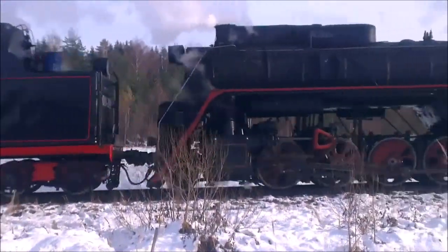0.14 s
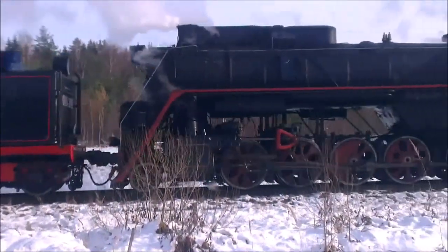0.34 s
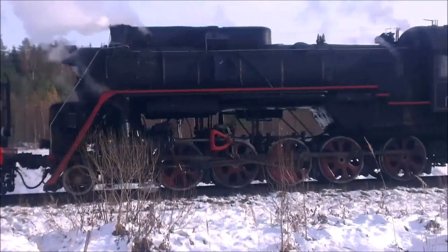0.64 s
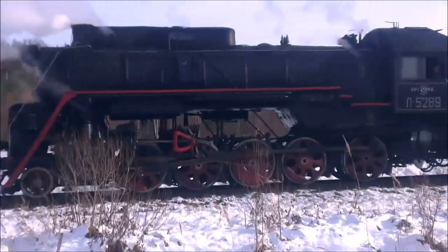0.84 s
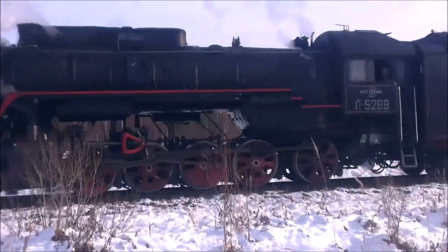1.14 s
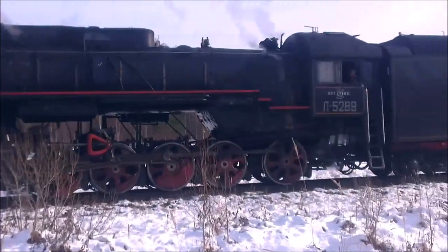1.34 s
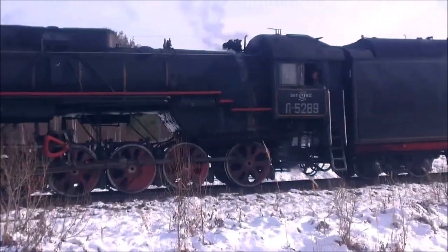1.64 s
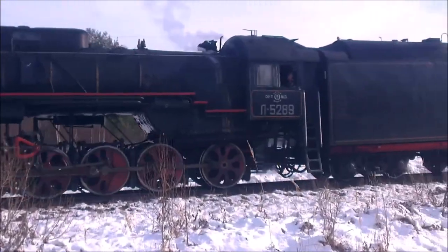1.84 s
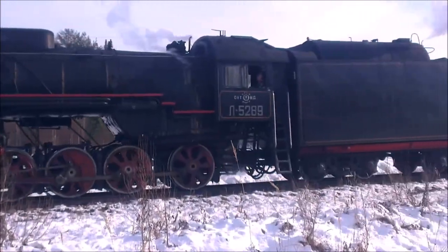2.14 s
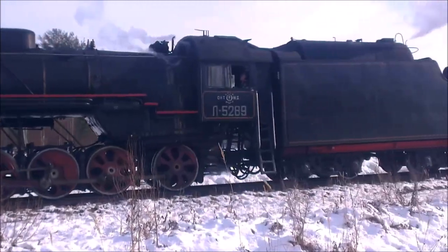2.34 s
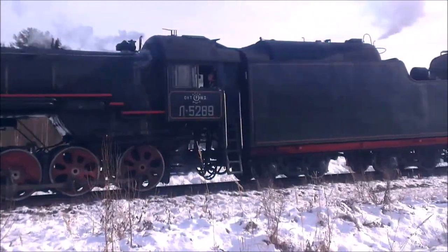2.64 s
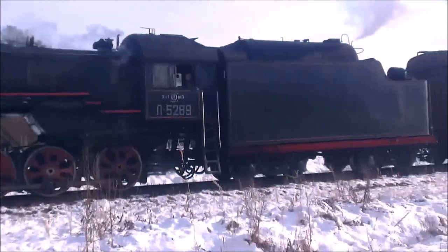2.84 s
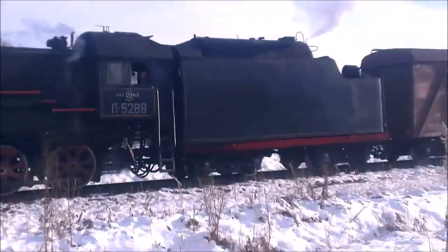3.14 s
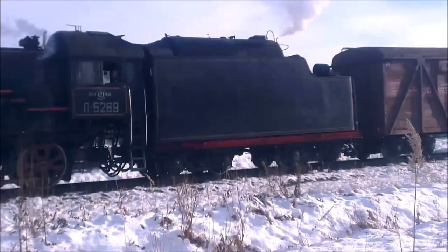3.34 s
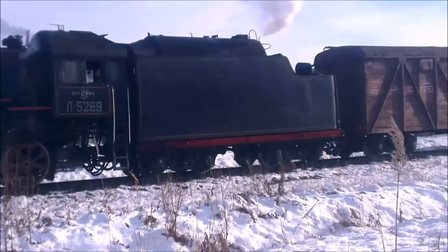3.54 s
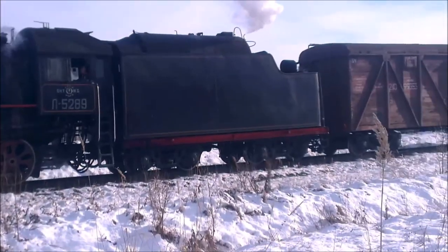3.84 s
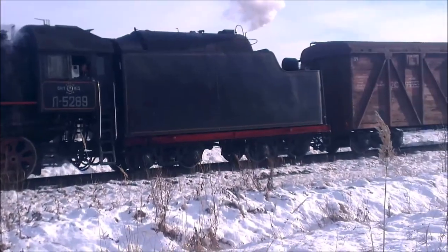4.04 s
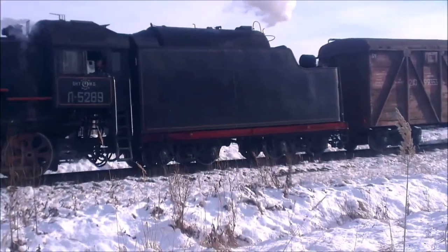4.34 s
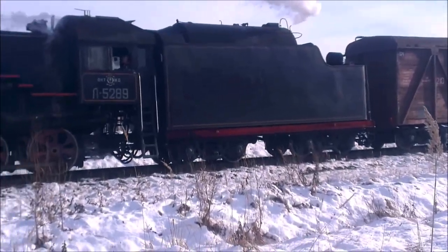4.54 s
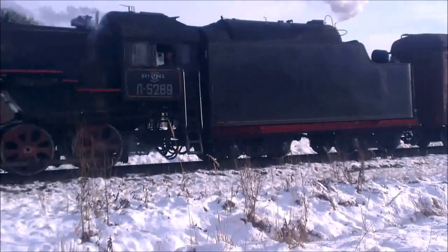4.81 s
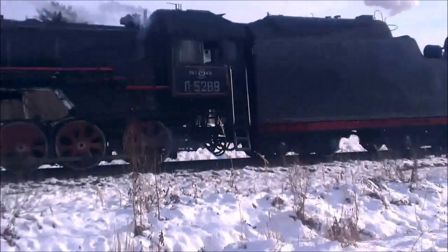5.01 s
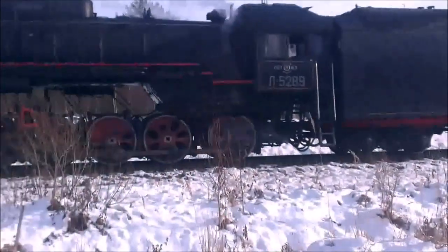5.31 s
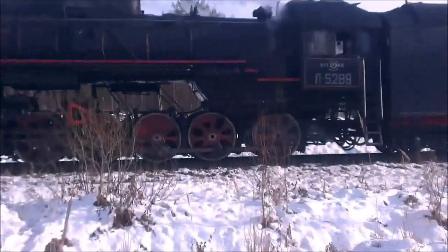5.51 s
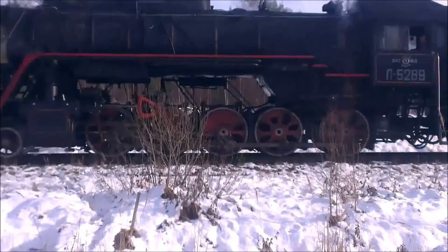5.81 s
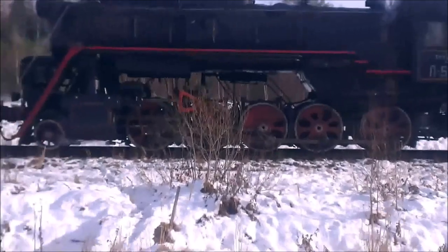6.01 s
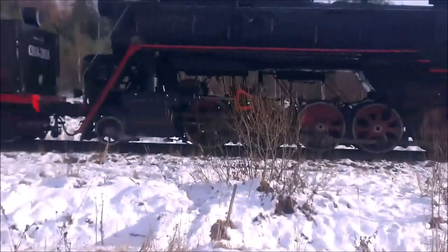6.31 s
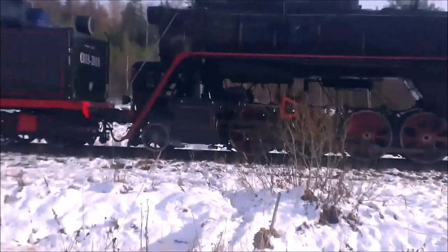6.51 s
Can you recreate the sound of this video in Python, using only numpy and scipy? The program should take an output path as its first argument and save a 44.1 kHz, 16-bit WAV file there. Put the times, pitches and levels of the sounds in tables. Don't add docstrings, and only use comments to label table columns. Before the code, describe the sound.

Outdoors beside a snowy railway, two steam locomotives pass close by. Dense, bright steam hiss runs throughout, over a thin roar of draught and wheels and a steady high turbine buzz. Quick valve puffs cluster at the start, then hollow chimney chuffs come about once a second. Dry squeaks chirp near the middle. The hiss recedes, then swells again toward the end. Handheld stereo microphone, little bass.

```python
import sys
import numpy as np
from scipy import signal
from scipy.fft import rfft, irfft, next_fast_len
from scipy.io import wavfile
from scipy.ndimage import uniform_filter1d, map_coordinates

SR = 44100
rng = np.random.default_rng(int(sys.argv[2]) if len(sys.argv) > 2 else 0)


def level_to_linear(level):
    exponent = np.asarray(level, float) / 20
    return 10 ** exponent


def to_wav(s):
    ch = np.atleast_2d(s).T
    pcm = np.round(np.clip(ch, -1, 1) * 32767)
    wavfile.write(sys.argv[1], SR, pcm.astype(np.int16))


N = 293706
PAD = next_fast_len(N + 4096)
HZ = np.maximum(np.arange(PAD // 2 + 1) * SR / PAD, 1)
T = np.arange(N) / SR

# (time [s], flow [dB], brightness [dB], left-right bearing [dB])
LEAKS = [(0, -25, -1.5, -4.5), (.65, -21.5, 2, -3), (1.45, -21, -1.5, -4), (2.05, -25, 2, -2),
         (2.34, -26, 2, -2), (2.69, -23, 0.5, -2), (3.2, -29, -0.5, -1), (3.54, -32, 3.5, -6),
         (3.74, -26, 9, 3.5), (3.91, -24.5, -3, -6), (4.15, -27, -8.5, -2.5), (4.5, -28, 0.1, -5),
         (4.73, -24, -1.5, -4.5), (5.03, -27.5, -2.5, -3.5), (5.2, -20.5, 3.5, -7.5), (5.55, -21, 2, -6),
         (6.3, -20, -0.5, -7), (6.66, -21, 0.5, -5)]
# (frequency [Hz], density [dB per Hz])
JET_SPECTRUM = [(700, -9), (1200, 3.5), (2000, -4), (2500, -2), (2900, -3.5), (3600, -2.5), (4400, -6),
                (5600, -12.5), (6750, -5.5), (7900, -10), (9500, -8), (11300, -17.5), (13000, -21.5),
                (15200, -25.5)]
# (time [s], level [dB], exposure [dB])
DRAUGHT = [(0, -30, 1), (.35, -32, 0.5), (.83, -33, -1.8), (1.2, -34, -4.5), (1.6, -36.5, 0.5),
           (2.1, -37.5, 3), (2.4, -39, 0), (2.8, -40.5, 1), (3.5, -44.5, -1.5), (4.1, -40, 0.5),
           (4.45, -41, -1.5), (4.7, -38.5, 1), (5.3, -37.5, 0), (5.64, -42.5, 1.5), (6.2, -37.5, -7),
           (6.66, -41.5, -2.5)]


def rms_one(x):
    return x / np.sqrt(np.mean(x ** 2) + 1e-20)


def in_time(rows):
    s, *columns = np.transpose(rows)
    return [np.interp(T, s, column) for column in columns]


def at_hz(points):
    hz, value = np.transpose(points)
    return np.interp(np.log(HZ), np.log(np.maximum(hz, 1)), value)


def around(s, reach_s):
    return slice(max(int((s - reach_s) * SR), 0), int((s + reach_s) * SR))


def follow(curve_db, offset_db, share):
    mean_db = curve_db.mean()
    return mean_db + offset_db + share * (curve_db - mean_db)


def near_to_far(near, far):
    # (time [s], 0 near - 1 far)
    away = [(0, -.2), (.6, 0.21), (1.2, 0.6), (2.2, 0.91), (4.2, 0.96), (5, 0.79), (5.3, 0.53), (5.9, .2),
            (6.3, 0.46), (6.66, 0.23)]
    return near + (far - near) * in_time(away)[0]


def drift(rate_hz):
    pole = np.exp(-2 * np.pi * rate_hz * 40 / SR)
    draws = rng.standard_normal(N // 40 + 2002)
    slow = signal.lfilter([1], [1, -2 * pole, pole ** 2], draws)[2000:]
    return np.interp(np.arange(N) / 40, np.arange(len(slow)), rms_one(slow))


def at_ports(spectrum, diffuse=1.0):
    # (frequency [Hz], likeness [0-1])
    likeness = [(100, 0.7), (300, 0.72), (700, 0.37), (1300, 0.67), (1700, 0.22), (1900, 0.78), (2400, 0.3),
                (2800, 0), (4200, 0.31), (5500, 0), (15000, 0.1)]
    # (frequency [Hz], phase [rad])
    port_lag = [(300, 0), (600, -.9), (1000, -1.9), (1350, -3.1), (1700, -3.6), (2300, -6.3), (3000, -9.4),
                (3450, -12.5), (4100, -15.7), (5000, -18.8), (6000, -22), (8000, -30), (11000, -41),
                (16000, -60)]
    alike = 1 - diffuse * (1 - np.clip(at_hz(likeness), 0, 1))
    scattered = np.abs(spectrum) * rfft(rng.standard_normal(PAD)) / np.sqrt(PAD)
    delayed = spectrum * np.exp(1j * at_hz(port_lag))
    return np.array([spectrum, alike * delayed + np.sqrt(1 - alike ** 2) * scattered])


def noise(gain):
    return gain * at_ports(rfft(rng.standard_normal(PAD)))


def band(spectra, low_hz, high_hz):
    edges = 1 / np.sqrt((1 + (low_hz / HZ) ** 16) * (1 + (HZ / high_hz) ** 16))
    return rms_one(irfft(spectra * edges, PAD)[:, :N])


def hiss(gust_db, flutter_db, patchy_db):
    # (low edge [Hz], high edge [Hz])
    leak_bands = [(2800, 5500), (1300, 2800), (8000, 19000)]
    # (offset [dB], share of flow, share of brightness, share of exposure)
    follows = [
        (2.5, 0.9, 0.0, 0.59),
        (-7, 0.37, -0.3, 1.0),
        (-5.5, 1.04, 1.0, 0.52),
    ]
    # (time [s], level [dB])
    fine_leak = [(0.0, -25.5), (1.67, -27.5), (2.32, -36.5), (2.82, -29.5), (3.32, -31.5), (3.91, -26),
                 (4.36, -30.5), (4.64, -26.5), (4.88, -41), (5.06, -33), (5.42, -24), (6.05, -19.5),
                 (6.29, -27), (6.66, -23)]
    # (low edge [Hz], high edge [Hz])
    fine_band = (5500, 8000)
    flow_db, bright_db, pan_db = in_time(LEAKS)
    exposure_db = in_time(DRAUGHT)[1]
    levels_db = [follow(flow_db, offset_db, flow) + bright * bright_db + facing * exposure_db
                 for offset_db, flow, bright, facing in follows]
    levels_db += in_time(fine_leak)
    jets = noise(level_to_linear(at_hz(JET_SPECTRUM)))
    shared_db = gust_db * drift(6.3) + flutter_db * drift(53.0)
    out = np.zeros((2, N))
    for level_db, edges in zip(levels_db, leak_bands + [fine_band]):
        out += level_to_linear(level_db + shared_db + patchy_db * drift(14.0)) * band(jets, *edges)
    return out * level_to_linear(np.outer([.5, -.5], pan_db - pan_db.mean()))


def nozzle(law, width_hz, flicker_db):
    near_hz, far_hz, offset_db, share = law
    level_db = follow(in_time(LEAKS)[0], offset_db, share)
    low_pass = 1 + (2 * HZ / width_hz) ** 4
    in_phase, quadrature = irfft(np.array([noise(0.91), noise(0.91)]) / low_pass, PAD)[..., :N]
    turn = 2 * np.pi * np.cumsum(near_to_far(near_hz, far_hz)) / SR
    carried = rms_one(in_phase * np.cos(turn) + quadrature * np.sin(turn))
    return level_to_linear(level_db + flicker_db * drift(11.3)) * carried


def over_snow(x, low_hz, high_hz):
    snow_lag_ms = (0.743, 0.915)
    snow_strength = (0.21, 0.049)
    edges = 1 / np.sqrt((1 + (low_hz / HZ) ** 6) * (1 + (HZ / high_hz) ** 6))
    middle = irfft(rfft(x, PAD) * edges, PAD)[:, :N]
    arrival = np.arange(N) - near_to_far(*snow_lag_ms) * SR / 1000
    late = np.array([map_coordinates(m, [arrival], order=1) for m in middle])
    return x + np.clip(near_to_far(*snow_strength), 0, 1) * late


def roar(lumpy_db):
    # (frequency [Hz], density [dB per Hz])
    colour = [(65, -91), (110, -48.5), (338, -24), (472, -26.5), (661, -14.5), (924, -15), (1360, -14),
              (1980, -9), (2400, -7), (3120, -21), (5280, -120)]
    # (offset [dB], share of the swing, share of exposure)
    follows = [
        (0.5, 1.0, 0.0),
        (6, 0.17, 0.7),
        (-20.0, 0.66, 0.0),
    ]
    bands_hz = [(450, 1200), (1200, 2000), (40, 450)]
    rumble = noise(level_to_linear(at_hz(colour)))
    draught_db, exposure_db = in_time(DRAUGHT)
    out = np.zeros((2, N))
    for (offset_db, share, facing), edges in zip(follows, bands_hz):
        level_db = follow(draught_db, offset_db, share) + facing * exposure_db
        out += level_to_linear(level_db + lumpy_db * drift(16.0)) * band(rumble, *edges)
    return out


def shimmer(x, depth_db):
    frames = signal.stft(x, nperseg=512)[2]
    field = rng.standard_normal(frames.shape[1:])
    field = uniform_filter1d(field, size=2, axis=0)
    field = uniform_filter1d(field, size=24, axis=1)
    return signal.istft(frames * level_to_linear(depth_db * rms_one(field)), nperseg=512)[1][:, :N]


def turbine(uneven_db):
    # (time [s], level [dB])
    loudness = [(0, -27.5), (1.35, -23.5), (1.85, -24.5), (2.35, -27), (2.8, -26), (3.35, -28.5),
                (4.85, -25), (5.2, -30), (5.5, -18.5), (5.85, -25), (6.66, -23.5)]
    # (time [s], speed [turns per s])
    shaft_speed = [(0, 57.93), (1.35, 58.01), (2.85, 58.09), (3.35, 58.13), (4.35, 58.22), (5.85, 58.21),
                   (6.66, 58.16)]
    orders = [15, 17, 19, 23, 26, 28, 30, 31, 33, 37, 39, 40, 41, 42, 43, 45, 49, 53, 55, 57]
    orders_db = [-17.5, -16, -12, -1.5, -2.5, -17, -11, -6.5, -5, -3, -5.5, -1, 3, -1.5, -0.5, -27, -41,
                 2.5, 3.5, -19]
    turn = 2 * np.pi * np.cumsum(in_time(shaft_speed)[0]) / SR
    whine = np.zeros(N)
    for order, level_db in zip(orders, orders_db):
        whine += level_to_linear(level_db + uneven_db * drift(1.13)) * np.sin(order * turn)
    heard = irfft(at_ports(rfft(whine, PAD), diffuse=0), PAD)[:, :N]
    return level_to_linear(in_time(loudness)[0]) * rms_one(heard)


def recorder_noise(hiss_db, breeze_db):
    white = noise(1)
    breeze = level_to_linear(breeze_db + 7.0 * drift(9.0)) * band(white, 20, 110)[0]
    return level_to_linear(hiss_db) * band(white, 11500, 15000) + breeze


def swells(rows):
    power = np.zeros(N)
    for s, width_ms, level_db in rows:
        near = around(s, .2)
        widths = (T[near] - s) * 1000 / max(width_ms, 8)
        power[near] += level_to_linear(level_db) ** 2 * np.exp(-4 * np.log(2) * widths ** 2)
    return power


def puffs(ragged_db):
    # (time of peak [s], width [ms], level [dB], treble over middle [dB])
    valve_puffs = [(.036, 17, -18.5, -1), (.088, 26, -17.5, 20), (0.15, 16, -13.5, -4),
                   (0.226, 26, -14, -7.5), (.326, 50, -22.5, -14), (.403, 17, -13, -4), (.75, 33, -20, 5),
                   (.864, 82, -18, -6), (1.164, 15, -25, -2), (1.599, 39, -17.5, 11),
                   (1.739, 21, -18.5, 13), (1.787, 23, -22, -20), (1.9, 13, -20, -5), (2.0, 35, -19.5, 14),
                   (2.436, 41, -15, -2), (2.722, 16, -16.5, -7), (2.82, 40, -17.5, -13),
                   (3.265, 33, -20.5, -5), (3.41, 133, -23, -19), (3.739, 29, -11.5, 1.5),
                   (3.891, 29, -22, -4), (4.169, 54, -20.5, -13), (4.546, 40, -20, -12),
                   (5.063, 18.4, -26, -23), (5.187, 24, -26, 20), (5.538, 68, -15.5, -3),
                   (5.873, 24.7, -17, 0), (6.159, 76, -15, 3.5), (6.264, 47, -15, -6.5),
                   (6.589, 34, -22, -1)]
    # (time of peak [s], width [ms], level [dB])
    gasps = [(.036, 20, -26), (.149, 31, -22), (.224, 39, -28), (1.336, 75, -41), (1.787, 20, -24),
             (1.9, 11, -29), (2.441, 38, -26.5), (3.069, 15, -34), (3.265, 53, -31.5), (3.481, 30, -32.5),
             (3.737, 11, -12.5), (3.735, 80, -24.5), (3.895, 40, -25), (4.643, 17, -30), (5.186, 26, -28)]
    # (low edge [Hz], high edge [Hz])
    puff_bands = [(700, 2100), (2100, 5500), (5500, 19000)]
    s, width_ms, level_db, tilt_db = np.transpose(valve_puffs)
    middle_db = level_db - 10 * np.log10(1 + level_to_linear(tilt_db) ** 2)
    treble_db = middle_db + tilt_db
    powers = [swells(gasps), swells(zip(s, width_ms, middle_db)), swells(zip(s, width_ms, treble_db))]
    jets = noise(level_to_linear(at_hz(JET_SPECTRUM)))
    bursts = sum(np.sqrt(power) * band(jets, *edges) for power, edges in zip(powers, puff_bands))
    return level_to_linear(ragged_db * drift(81.0)) * bursts


def resonances(modes):
    response = 0
    for k, (hz, width_hz, level_db) in enumerate(modes):
        damping = 1j * HZ * width_hz
        response = response + (-1) ** k * level_to_linear(level_db) * damping / (hz ** 2 - HZ ** 2 + damping)
    return response


def chimney(ragged_db):
    # (time of peak [s], level [dB], fall [ms])
    beats = [
        (.05, -30, 130),
        (.85, -20.5, 28),
        (1.84, -24.5, 70),
        (2.79, -28, 84),
        (3.745, -28, 44),
        (3.9, -37, 25),
        (4.66, -28, 52),
        (5.19, -33, 30),
        (5.565, -24.5, 84),
        (6.485, -21.5, 65),
    ]
    # (centre [Hz], width [Hz], level [dB])
    pipe_modes = [(717, 64, -5.5), (840, 45, 1.5), (1104, 190, 0.5)]
    rise_ms = 36
    power = np.zeros(N)
    for s, level_db, fall_ms in beats:
        near = around(s, .7)
        late_ms = (T[near] - s) * 1000
        decay = np.where(late_ms < 0, (late_ms / rise_ms) ** 2, late_ms / fall_ms)
        power[near] += level_to_linear(level_db) ** 2 * np.exp(-decay)
    bass_cut = np.sqrt(1 + (480.0 / HZ) ** 8)
    blast = rms_one(irfft(noise(resonances(pipe_modes) / bass_cut), PAD)[:, :N])
    return np.sqrt(power) * level_to_linear(ragged_db * drift(54.0)) * blast


def bumps(thud_hz, fade_s):
    # (time [s], peak [dB])
    knocks = [(0.099, -84), (0.409, -78), (0.999, -79), (1.249, -81), (1.429, -81), (1.969, -98),
              (3.899, -86), (4.129, -69), (4.399, -68), (4.699, -90), (4.799, -66), (5.179, -87),
              (5.619, -71), (6.519, -63)]
    out = np.zeros(N)
    for s, level_db in knocks:
        near = around(s, .2)
        late_s = np.maximum(T[near] - s, 0)
        out[near] += level_to_linear(level_db) * np.sin(2 * np.pi * thud_hz * late_s) * np.exp(-late_s / fade_s)
    return out


def squeaks():
    # (time of peak [s], width [ms], level [dB], pitch [Hz])
    rubs = [(.1, 200, -27, 7510), (1.19, 43, -19, 3430), (2.468, 18, -18.5, 3070), (2.592, 15, -16, 3150),
            (2.655, 23, -28, 6130), (2.712, 14, -15.5, 6130), (2.785, 12, -20, 3200), (2.97, 16, -22, 3315),
            (3.74, 35, -23, 1517), (3.745, 56, -24.5, 6000), (4.11, 17, -25.5, 1517), (4.42, 50, -38, 1517)]
    tone = np.zeros(N)
    for s, width_ms, level_db, hz in rubs:
        near = around(s, .3)
        swell = np.exp(-2 * np.log(2) * ((T[near] - s) * 1000 / width_ms) ** 2)
        tone[near] += level_to_linear(level_db) * swell * np.sin(2 * np.pi * hz * T[near])
    return tone * level_to_linear(np.array([[-1.5], [1.5]]))


def scene():
    # (near [Hz], far [Hz], offset [dB], share of flow)
    upper_nozzle = (3760, 3279, -5.0, 1.58)
    lower_nozzle = (2600, 2339.5, -7.5, 1.27)
    # (frequency [Hz], left-right [dB])
    port_balance = [(150, 2), (450, -1.5), (700, -4), (880, -3.5), (1150, -4.5), (1700, -7), (2600, 1),
                    (3200, 0), (4300, -10), (5600, 0), (6700, -7.5), (8000, -1), (9100, 5.0), (13000, 1.5)]
    steam = hiss(gust_db=0.49, flutter_db=0.5, patchy_db=1.62)
    steam += nozzle(upper_nozzle, width_hz=720.0, flicker_db=1.0)
    steam += nozzle(lower_nozzle, width_hz=430.0, flicker_db=1.0)
    steam = over_snow(steam + puffs(ragged_db=1.5), low_hz=1850.0, high_hz=3900.0)
    train = shimmer(steam + roar(lumpy_db=2.5), depth_db=2.0)
    train = train + turbine(uneven_db=3.0) + chimney(ragged_db=2.0) + squeaks()
    shade = level_to_linear(np.outer([.5, -.5], at_hz(port_balance)))
    return irfft(rfft(train, PAD) * shade, PAD)[:, :N] * level_to_linear(-2.5)


def roll_off(x):
    return signal.sosfilt(signal.butter(12, 16340, fs=SR, output="sos"), x)


def record(dry):
    echo_samples = 88.8
    widener = level_to_linear(-3.0) * (1 + 0.46 * np.exp(-2j * np.pi * HZ * echo_samples / SR))
    mid = (dry[0] + dry[1]) / 2
    side = irfft(rfft((dry[0] - dry[1]) / 2, PAD) * widener, PAD)[:N]
    wide = np.array([mid + side, mid - side])
    rounded = wide / (1 + (wide / .95) ** 6) ** (1 / 6)
    bass_cut = signal.butter(4, 170.0, "high", fs=SR, output="sos")
    thin = signal.sosfilt(bass_cut, rounded)
    thin += bumps(thud_hz=50.0, fade_s=0.017) + recorder_noise(hiss_db=-49.0, breeze_db=-99.0)
    top_cut = signal.cheby2(22, 80, 15900, fs=SR, output="sos")
    mix = signal.sosfilt(top_cut, thin)
    return roll_off(mix)


dry = scene()
out = record(dry)
to_wav(out)
```